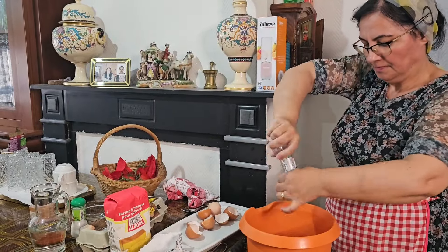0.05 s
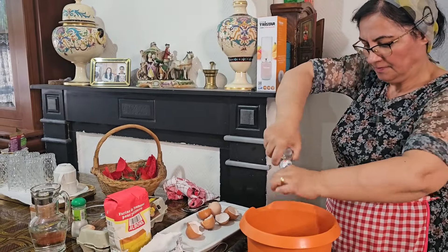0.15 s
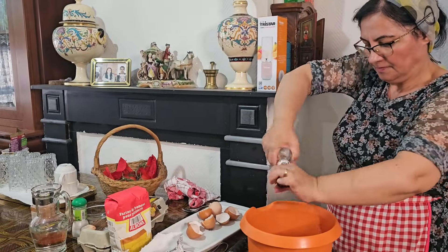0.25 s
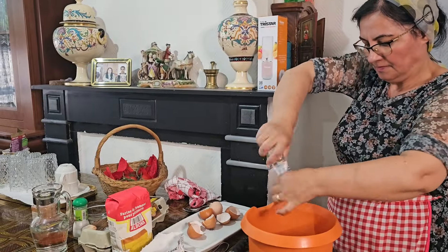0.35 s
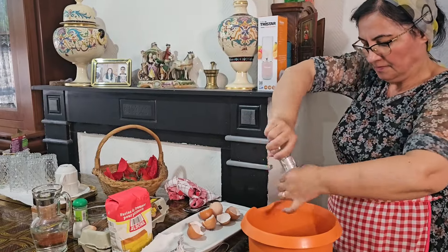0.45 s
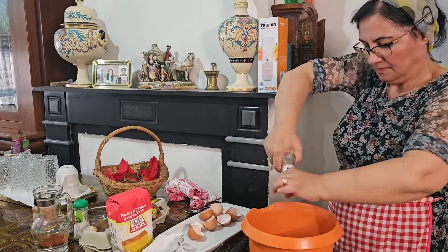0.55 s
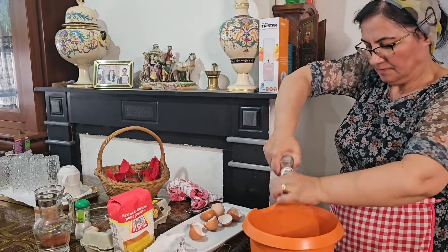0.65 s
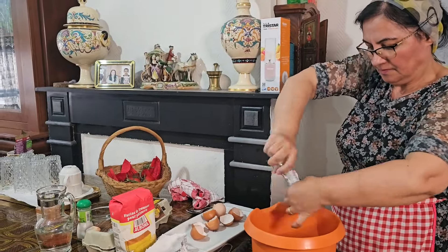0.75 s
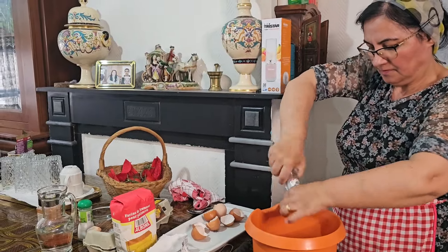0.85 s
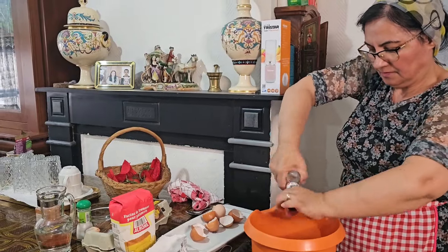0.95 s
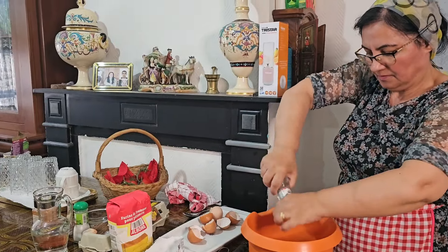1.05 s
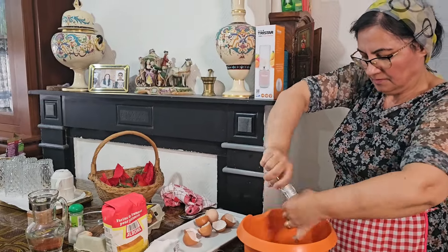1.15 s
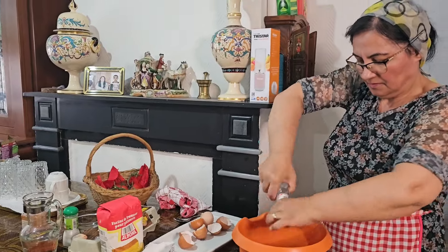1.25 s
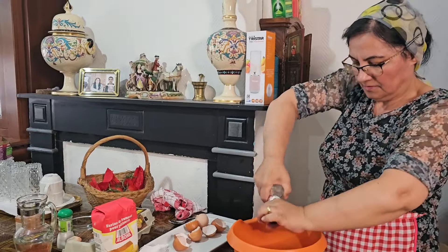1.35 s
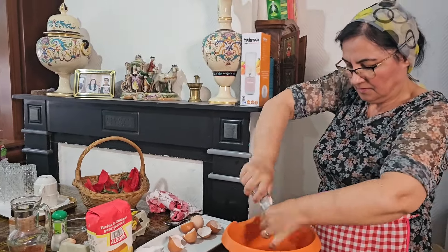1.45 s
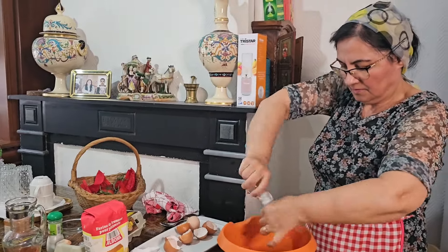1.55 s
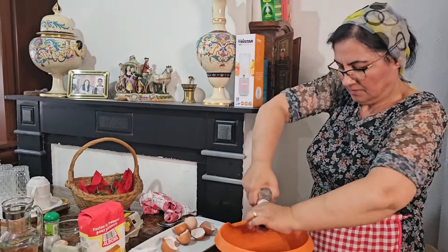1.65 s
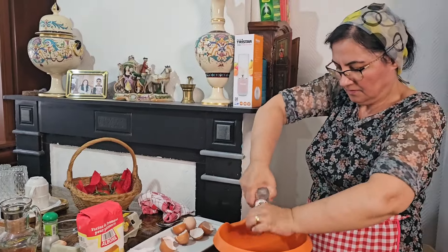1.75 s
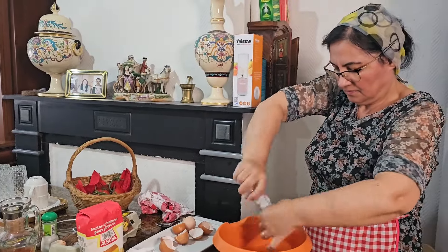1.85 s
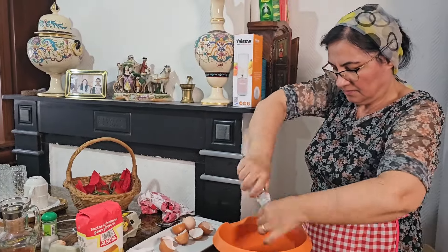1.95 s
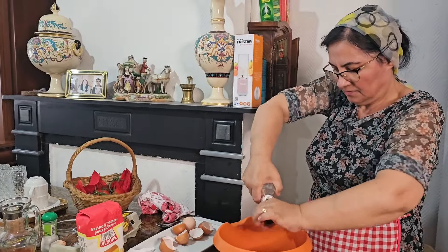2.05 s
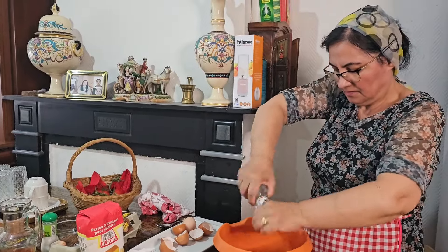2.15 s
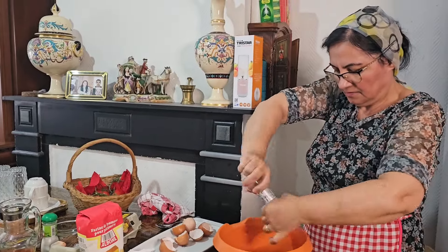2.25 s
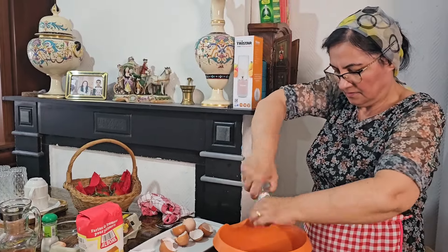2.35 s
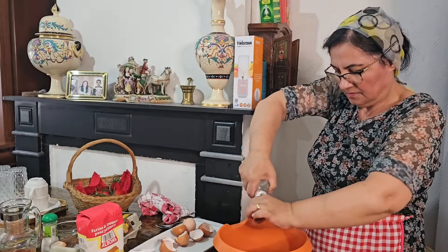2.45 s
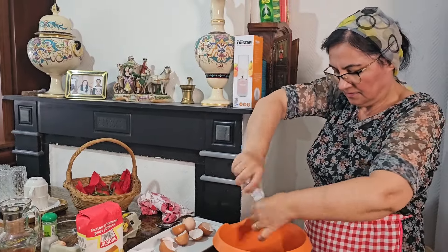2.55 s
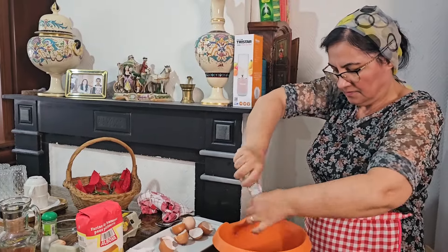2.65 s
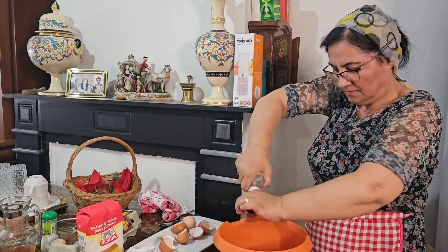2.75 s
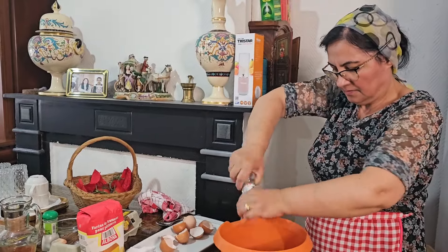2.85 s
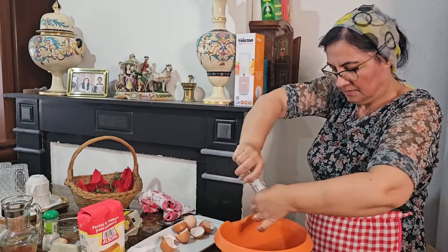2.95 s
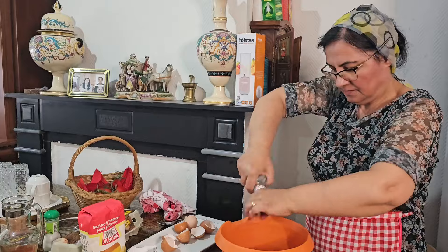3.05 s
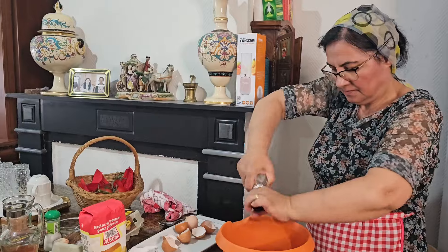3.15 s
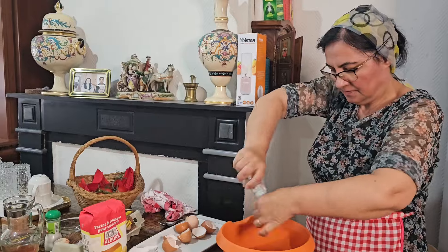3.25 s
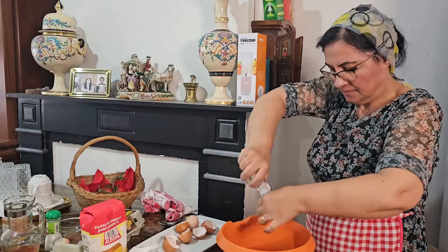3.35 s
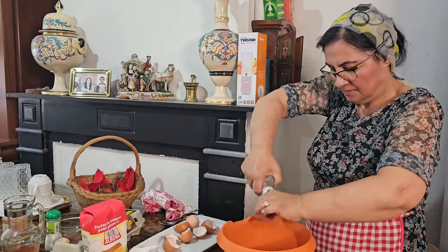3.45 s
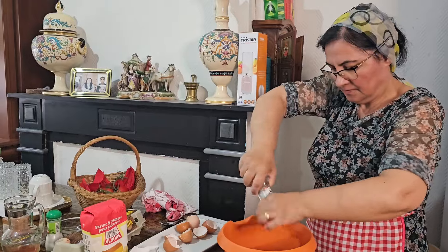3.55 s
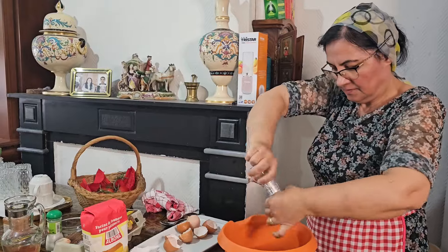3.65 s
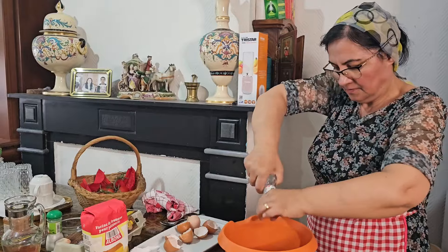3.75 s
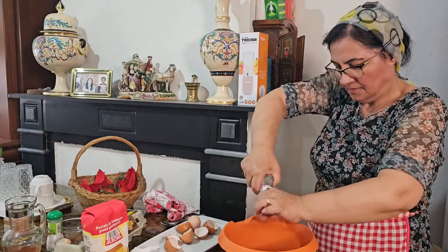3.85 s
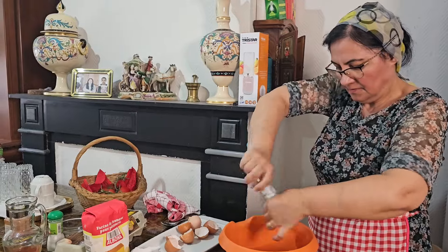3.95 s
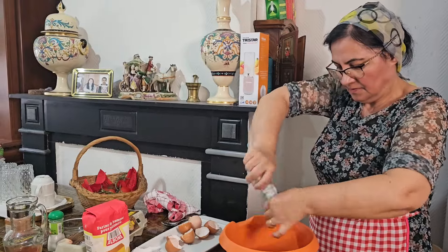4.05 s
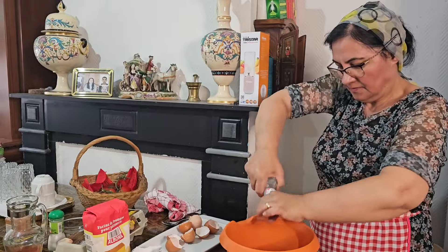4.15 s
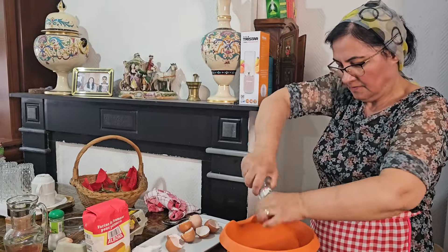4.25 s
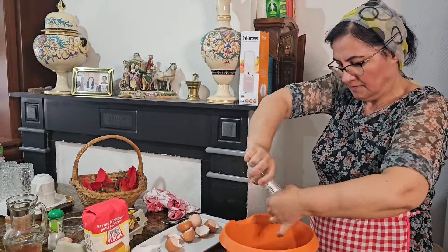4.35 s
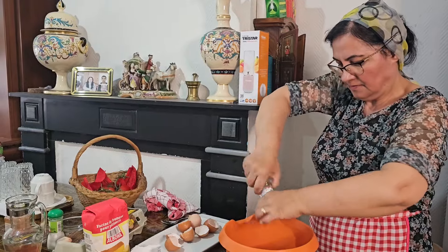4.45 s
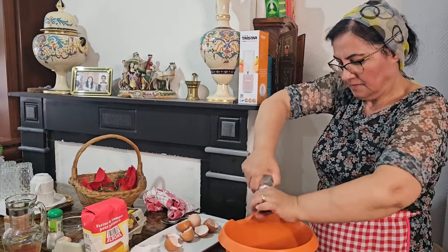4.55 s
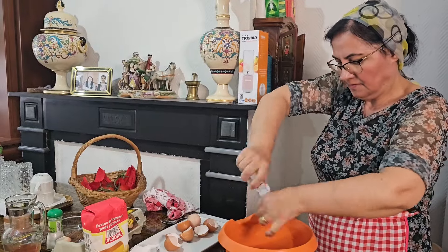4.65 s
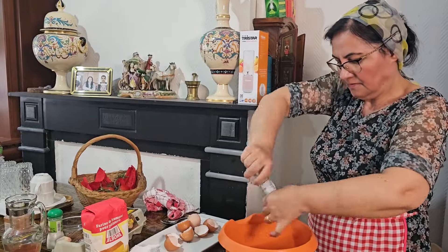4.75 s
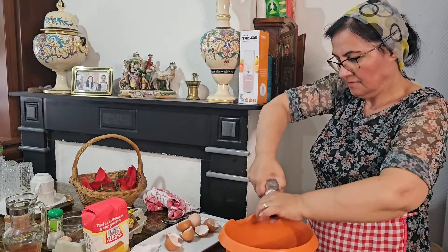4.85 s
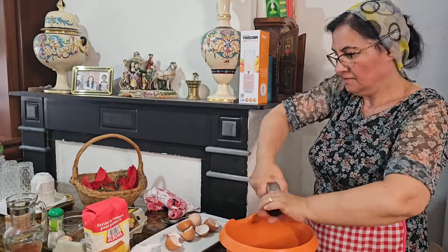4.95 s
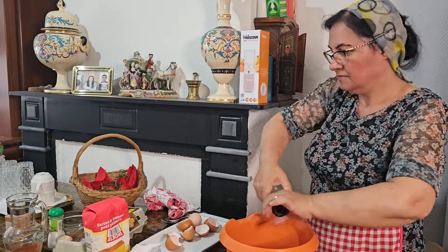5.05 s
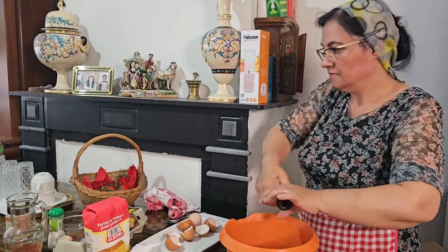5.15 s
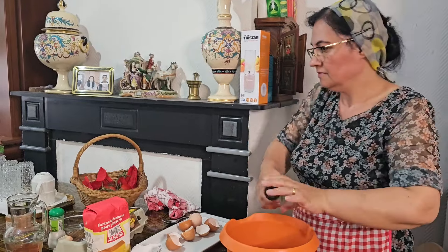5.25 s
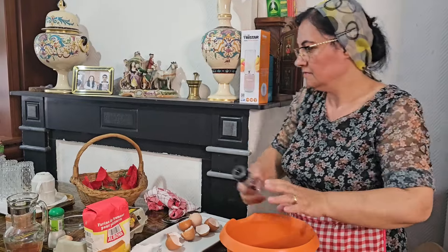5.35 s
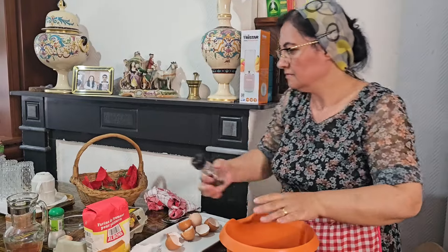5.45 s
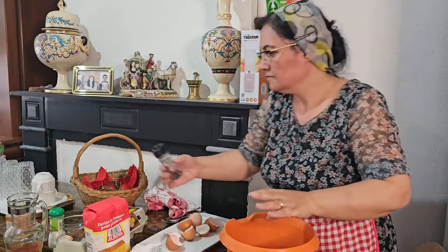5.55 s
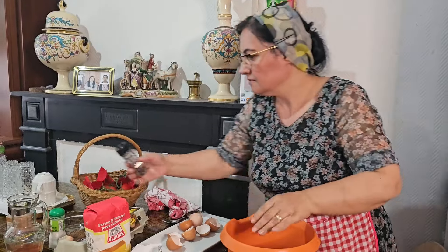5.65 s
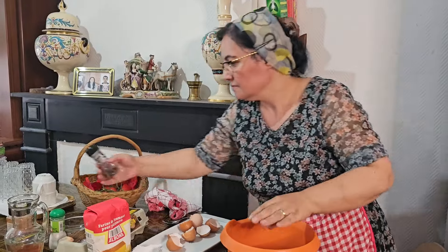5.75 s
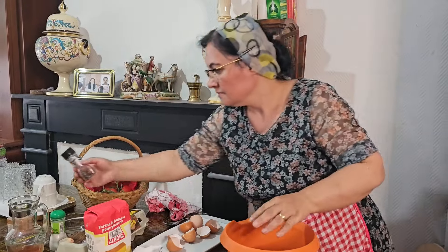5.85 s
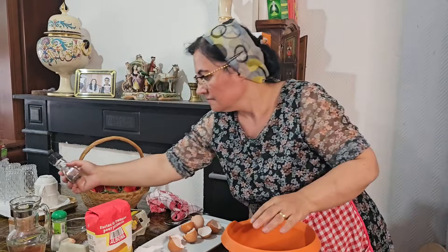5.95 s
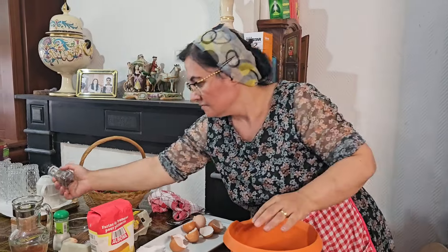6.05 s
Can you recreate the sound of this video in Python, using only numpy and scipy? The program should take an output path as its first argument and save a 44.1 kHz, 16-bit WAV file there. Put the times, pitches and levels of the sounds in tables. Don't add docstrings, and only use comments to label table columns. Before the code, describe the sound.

A glass pepper mill is twisted close by in a small kitchen, dry gritty crunches and sharp snaps repeating about three times a second over faint hum.

```python
import sys
import numpy as np
from scipy import signal
from scipy.fft import rfft, irfft
from scipy.io import wavfile
from scipy.ndimage import uniform_filter1d, map_coordinates

SR = 44100
rng = np.random.default_rng(int(sys.argv[2]) if len(sys.argv) > 2 else 0)


def wrap_up_sound(samples):
    columns = np.atleast_2d(samples).T
    tamed = np.clip(columns, -1, 1)
    steps = np.round(tamed * 32767).astype(np.int16)
    wavfile.write(sys.argv[1], SR, steps)


def gain_from_db(level_db):
    decades = np.asarray(level_db, float) / 20
    return 10 ** decades


N = 269010

# (frequency [Hz], level [dB], t60 [s])
HOLLOW_MODES = [(1820, -6, .04), (1905, -7, .03), (1955, -5, .04), (2030, -5, .03), (2100, -8, .03),
                (2150, -8, .04), (1985, 9, .009)]
# (frequency [Hz], level [dB], t60 [s])
WALL_MODES = [(2300, -1, .03), (2400, 0, .012), (2495, -7, .03)]


def rms_one(x):
    return x / np.sqrt(np.mean(x ** 2) + 1e-20)


def at_hz(points, hz):
    table_hz, values = np.array(points).T[:2]
    return np.interp(np.log(hz + 1), np.log(table_hz), values)


def drift(rate):
    knots = rng.standard_normal(400)
    return map_coordinates(knots, [np.arange(N) / SR * rate + 3], order=3)


def band(x, low_hz, high_hz):
    return signal.sosfilt(signal.butter(3, [low_hz, high_hz], "band", fs=SR, output="sos"), x)


def colour(x, spectrum):
    size = 4096
    log_gain = np.log(gain_from_db(at_hz(spectrum, np.fft.rfftfreq(size, 1 / SR))))
    cepstrum = irfft(log_gain)
    cepstrum[1:size // 2] *= 2
    cepstrum[size // 2 + 1:] = 0
    response = irfft(np.exp(rfft(cepstrum)))
    return signal.fftconvolve(x, response[None], axes=1)[:, :N]


def ring(clicks, modes):
    out = 0
    for row, (hz, level_db, t60) in zip(clicks, modes):
        r = gain_from_db(-60 / (t60 * SR))
        w = 2 * np.pi * hz / SR
        mode = signal.lfilter([0, np.sin(w)], [1, -2 * r * np.cos(w), r * r], row + 1e-18)
        out = -out + gain_from_db(level_db) * mode
    return out


def swell(rows, rise, fall):
    start_s, hold_s, *levels_db = np.transpose(rows)[:, :, None]
    t = np.arange(0, N + 64, 64) / SR
    early = np.maximum(start_s - t, 0)
    late = np.maximum(t - start_s - np.maximum(hold_s, 0), 0)
    loss_db = rise * early + fall * late
    curves = [gain_from_db(level_db - loss_db).max(axis=0) for level_db in levels_db]
    return np.array([np.interp(np.arange(N) / SR, t, curve) for curve in curves])


def hiss():
    # (frequency [Hz], density [dB per Hz])
    noise_spectrum = [(35, 2.5), (75, -3.5), (130, 2), (200, -1.5), (320, 2), (400, -10), (800, -9.5),
                      (950, -15), (1500, -8), (3700, -10.5), (7000, -16), (11700, -20.5), (15500, -23),
                      (15900, -53)]
    # (frequency [Hz], likeness [-1 to 1])
    noise_likeness = [(60, .7), (130, .7), (290, .85), (640, .36), (1400, 0), (15000, 0)]
    level_db = -52.5
    hz = np.fft.rfftfreq(N, 1 / SR)
    mid, side = rfft(rng.standard_normal((2, N))) * gain_from_db(at_hz(noise_spectrum, hz))
    alike = np.clip(at_hz(noise_likeness, hz), -1, 1)
    both = irfft(np.sqrt(1 + alike) * mid + np.sqrt(1 - alike) * side * [[1], [-1]], N)
    balance_db = np.array([[.6], [-.6]])
    return gain_from_db(level_db) * rms_one(both) * gain_from_db(balance_db + 0.59 * drift(0.88))


def fridge():
    # (frequency [Hz], level [dB rms], wander [dB])
    hum_tones = [(49.3, -49, .4), (100, -59.5, .8), (163.2, -55, .8), (265.5, -62, 1.5), (301, -67, 2),
                 (250, -68, 2)]
    t = np.arange(N) / SR
    total = 0
    for hz, level_db, wander_db in hum_tones:
        level = np.sqrt(2) * gain_from_db(level_db + wander_db * drift(12))
        total = total + level * np.sin(2 * np.pi * hz * t + 1.03 * wander_db * drift(10))
    return total * gain_from_db(np.array([[.4], [-.4]]))


def room_answer():
    # (frequency [Hz], t60 [s])
    tail_decay = [(300, 0.25), (2000, 0.25), (6000, 0.27), (14000, 0.26)]
    # (frequency [Hz], likeness [0 to 1])
    tail_likeness = [(300, 0.6), (1500, 0), (2300, 0.36), (3500, 0.33), (12000, 0)]
    # (delay [s], left level [dB], right level [dB])
    early_echoes = [
        (.0022, 0.5, -25.5),
        (.0074, -4, -1),
        (.013, -55, -50),
    ]
    tail_db = 2
    t = np.arange(SR // 2) / SR
    hz, frames, (mid, side) = signal.stft(rng.standard_normal((2, len(t))), SR, nperseg=256)
    alike = np.clip(at_hz(tail_likeness, hz), 0, 1)[:, None]
    cells = np.sqrt(1 + alike) * mid + np.sqrt(1 - alike) * side * [[[1]], [[-1]]]
    decay = gain_from_db(-60 * frames / at_hz(tail_decay, hz)[:, None])
    tail = signal.istft(cells * decay, SR)[1][:, :len(t)]
    tail *= np.clip((t - .004) / 0.0071, 0, 1)
    room = gain_from_db(tail_db) * tail / np.sqrt(np.sum(tail ** 2, axis=1, keepdims=True))
    room[:, 0] += 1
    for k, (delay, left_db, right_db) in enumerate(early_echoes):
        at = round(delay * SR * rng.uniform(.94, 1.06))
        room[0, at] += gain_from_db(left_db)
        room[1, at + 3 * k + 2] += gain_from_db(right_db)
    return room


def kitchen(x):
    turn_s, poses = .355, 4
    pose = ((np.arange(N) / SR + .12) // turn_s) % poses
    out = 0
    for k in range(poses):
        share = uniform_filter1d((pose == k) * 1., size=400)
        out = out + signal.fftconvolve(x * share, room_answer(), axes=1)[:, :N]
    return out


def splinter(count, decay_s, apart):
    t = np.arange(400) / SR
    shape = np.exp(-t / decay_s) * np.minimum(t / 0.00055, 1)
    shared = rng.standard_normal((count, 1, len(t)))
    separate = rng.standard_normal((count, 2, len(t)))
    spectrum = rfft((shared + apart * separate) * shape)
    burst = irfft(spectrum / np.abs(spectrum)) * np.sqrt(shape)
    return burst / np.sqrt(np.sum(burst ** 2, axis=2, keepdims=True))


def crunch():
    # (time [s], hold [s], fine crunch [dB], rub on the hollow [dB], rub on the upper wall modes [dB])
    bites = [(.1, 0.0083, -45.5, -44, -63), (.29, 0.032, -35.5, -44, -41), (.635, 0.059, -38, -32.5, -43),
             (.97, 0.0071, -39.5, -45, -55), (1.04, 0.026, -34.5, -30.5, -31.5),
             (1.39, 0.018, -32.5, -38, -56), (1.73, 0.033, -38.5, -38, -40),
             (2.105, 0.041, -36, -38.5, -47), (2.47, 0.0063, -35.5, -46, -41),
             (2.54, 0.0086, -51, -60, -46), (2.8, 0.034, -44, -42, -52), (2.885, 0.015, -42, -57, -35),
             (3.155, 0.025, -40, -45, -46), (3.52, 0.037, -47, -43, -44), (3.845, 0.034, -35, -54, -41),
             (4.21, 0.012, -37, -44, -50), (4.41, 0.022, -44, -45, -57), (4.565, 0.016, -42, -40.5, -64),
             (4.62, 0.0081, -37.5, -52, -44), (4.925, 0.011, -36, -37, -40),
             (4.99, 0.0076, -36, -50, -35.5)]
    # (time [s], hold [s], fine crunch [dB], rub on the hollow [dB])
    regrips = [(.001, 0.002, -41.5, -54), (.42, 0.08, -55, -46), (.8, 0.048, -50.5, -49),
               (1.19, 0.014, -45, -43.5), (1.35, 0.018, -48, -43), (1.56, 0.032, -53, -59),
               (1.94, 0.023, -51.5, -49), (2.3, 0.025, -54, -53), (2.69, 0.008, -53, -47.5),
               (2.98, 0.067, -53.5, -43), (3.24, 0.14, -50.5, -62), (3.39, .015, -54, -43.5),
               (3.64, 0.083, -55, -52.5), (4.01, 0.044, -49.5, -49), (4.73, 0.089, -57.5, -57),
               (5.1, 0.032, -75, -61)]
    # (time [s], hold [s], knock [dB])
    jolts = [
        (.31, .02, -64),
        (.68, .01, -49),
        (1.04, 0.007, -37.5),
        (1.385, 0.017, -61),
        (1.56, .003, -51),
        (1.76, 0.033, -64),
        (2.83, 0.0064, -50),
        (4.22, .01, -55),
        (4.57, 0.057, -53),
    ]
    grains_per_s, size_spread_db, colour_wander_db = 2000, 3, 2.8
    slips = swell(regrips, rise=296, fall=299)
    slip_wall = slips[0] * gain_from_db(-7)
    slips = np.array([*slips, slip_wall])
    fine, rub, wall = swell(bites, rise=632, fall=255) + slips
    knock = swell(jolts, rise=900, fall=500)[0] + rub * gain_from_db(-18)

    sizes = gain_from_db(size_spread_db * np.minimum(rng.exponential(1, N), 4)) * rng.choice([-1, 1], N)
    chance = grains_per_s * gain_from_db(3 * drift(40)) / SR
    ticks = rms_one(sizes * (rng.random(N) < chance))
    grain = splinter(count=1, decay_s=0.00037, apart=0.99)[0]
    raw_grit = signal.fftconvolve(ticks[None], grain, axes=1)[:, :N]
    edges_hz = [500, 3500, 5500, 8500, 12000, 19000]
    grit = 0
    for low_hz, high_hz in zip(edges_hz, edges_hz[1:]):
        grit = grit + band(raw_grit, low_hz, high_hz) * gain_from_db(colour_wander_db * drift(25.08))
    forces = ticks * np.array([rub * gain_from_db(-29), wall * gain_from_db(-25), knock * gain_from_db(-31.0)])
    return grit * fine * gain_from_db(-2.5), forces


def cracks():
    # (time [s], peak [dB], hollow ring [dB], brightness [dB])
    whole_corns = [(.0939, -21, -36, -3), (.2923, -16.5, -6, 7), (.303, -14, -7.5, 2),
                   (.625, -17.5, -20, -8.5), (.6549, -15.5, -19, 13), (.6664, -17, -23, 13),
                   (.6798, -8.5, -12, 6), (1.0415, -4, -7, 6.5), (1.1789, -25, -14, 11),
                   (1.3833, -8.5, -8, 12), (1.7201, -23.5, -4, -3), (1.7852, -13, -10.5, 8),
                   (2.0902, -22.5, -9, -5), (2.1049, -18, 3.5, -9), (2.4747, -23.5, -3.5, -9),
                   (2.5385, -20.5, -18, 4), (2.8266, -22.5, -11, 8), (2.8809, -14, -12, 7),
                   (2.9052, -9, -17, -1.5), (3.1537, -19, -6, -6.5), (3.2201, -16, -16, 11),
                   (3.383, -22.5, -4, -9), (3.5115, -18.5, -17, -3), (3.8297, -24, -4.5, 0),
                   (3.8491, -17, -19, 13), (3.928, -13, -15.5, 6), (4.572, -23, -4.5, -10),
                   (4.6133, -16, -19, 5), (4.9203, -18.5, -16, 18), (4.9877, -16, -7, 10)]
    # (time [s], peak [dB], hollow ring [dB])
    broken_pieces = [(.25, -31, -4), (0.2717, -24.5, -15), (0.6957, -26.5, -18), (0.9684, -29.5, -17),
                     (0.9747, -35, 2), (1.0308, -20, -9), (1.3383, -36.5, 1), (1.5581, -33.5, -1),
                     (1.5955, -31.5, -4), (1.7359, -35, -1), (1.7545, -26.5, -2), (2.2795, -36.5, -5),
                     (2.451, -25.5, -7), (2.64, -34.5, -10), (2.7908, -33.5, -3), (2.8722, -26, -20),
                     (3.031, -30.5, -17), (3.1676, -21.5, -18.5), (3.186, -28, -17), (3.3354, -26.5, -10.5),
                     (3.492, -30.5, -5), (3.528, -28.5, -4), (3.5444, -27, -11), (3.5817, -32, -3),
                     (3.6735, -37.5, -12), (4.1916, -30.5, -7), (4.3963, -32, -2), (4.4082, -27.5, -1.5),
                     (4.78, -33, -14), (4.915, -25, -12)]
    snap_s, chip_s, chip_bright_db = .0019, .004, -13
    snap_low_db, snap_high_db, wall_blow_db = 8, 8, -15
    rows = [*whole_corns, *[(*piece, chip_bright_db) for piece in broken_pieces]]
    mode_counts = [len(HOLLOW_MODES), len(WALL_MODES)]
    snaps = np.zeros((2, 2, N))
    blows = np.zeros((sum(mode_counts), N))
    decay_s = np.repeat([snap_s, chip_s], [len(whole_corns), len(broken_pieces)])
    bursts = splinter(count=len(rows), decay_s=decay_s[:, None, None], apart=1.0)
    strengths = gain_from_db(5.1 * rng.standard_normal((len(rows), len(blows))))
    for (s, peak_db, ring_db, bright_db), burst, strength in zip(rows, bursts, strengths):
        at = round(s * SR)
        halves_db = np.array([snap_low_db - bright_db / 2, snap_high_db + bright_db / 2])
        snaps[:, :, at:at + burst.shape[1]] += gain_from_db(peak_db + halves_db)[:, None, None] * burst
        blow_db = np.repeat([ring_db, wall_blow_db], mode_counts)
        blows[:, at] += gain_from_db(peak_db - 10.5 + blow_db) * strength
    low = signal.butter(2, 7000, "low", fs=SR, output="sos")
    high = signal.butter(2, 7000, "high", fs=SR, output="sos")
    return signal.sosfilt(low, snaps[0]) - signal.sosfilt(high, snaps[1]), blows


def pepper_mill():
    # (frequency [Hz], level [dB], t60 [s])
    thud_modes = [(330, -2.5, 0.028), (441, 1, 0.032), (493, -1, 0.03), (566, -7, 0.016)]
    # (frequency [Hz], density [dB per Hz])
    snap_spectrum = [(600, -12), (1000, -18), (1300, -9), (1600, 0), (2800, -1), (3700, 5), (4600, 1),
                     (7300, 0.5), (10300, -4.5), (11600, -2), (15200, -9.5), (15800, -23), (17000, -28)]
    thud_db = -21
    snaps, blows = cracks()
    grit, (rub, wall_rub, knock) = crunch()
    split = len(HOLLOW_MODES)
    body = band(ring(blows[:split] + rub, HOLLOW_MODES), 1750, 2230)
    body += band(ring(blows[split:] + wall_rub, WALL_MODES), 2230, 2600)
    body += band(ring(gain_from_db(thud_db) * blows + knock, thud_modes), 215, 870)
    direct = colour(snaps + grit, snap_spectrum)
    return direct * gain_from_db(np.array([[.2], [-.2]])) + body * gain_from_db(np.array([[.1], [-.1]]))


def scene():
    return kitchen(pepper_mill()) + fridge() + hiss()


def top_cut(x):
    return signal.sosfilt(signal.butter(12, 16800, fs=SR, output="sos"), x)


def record(dry):
    low_pass = signal.cheby2(10, 60, 17100, fs=SR, output="sos")
    mix = signal.sosfilt(low_pass, dry)
    return top_cut(mix)


dry = scene()
out = record(dry)
wrap_up_sound(out)
```